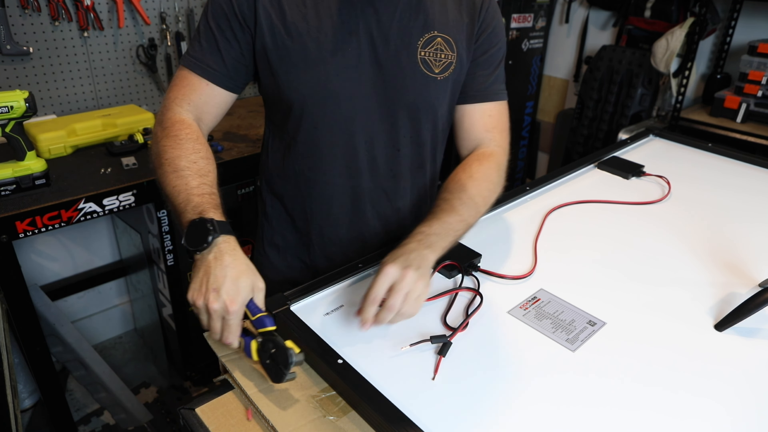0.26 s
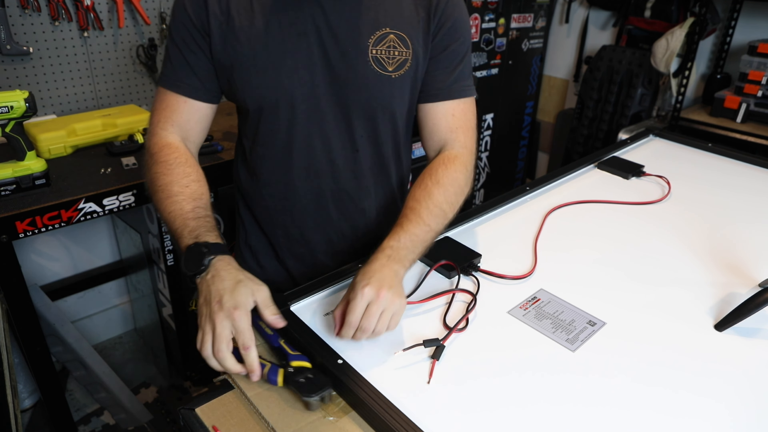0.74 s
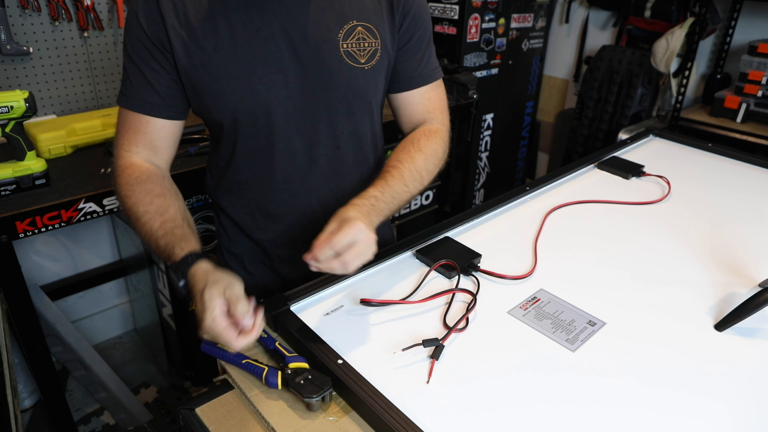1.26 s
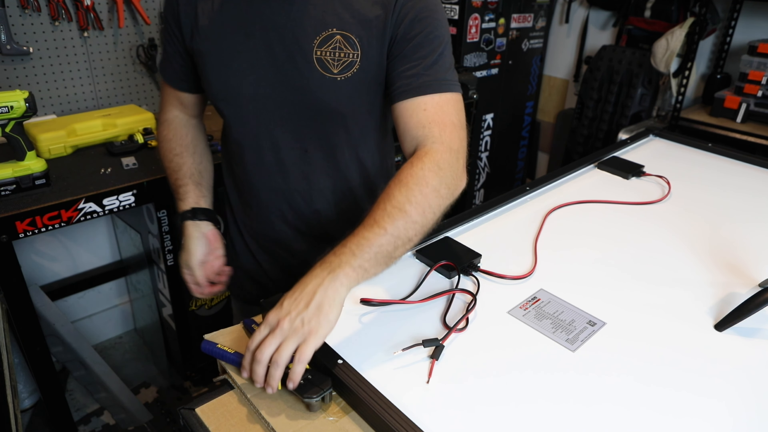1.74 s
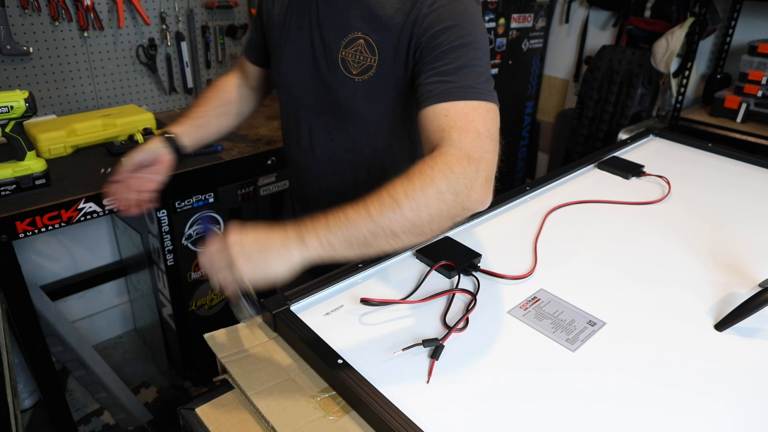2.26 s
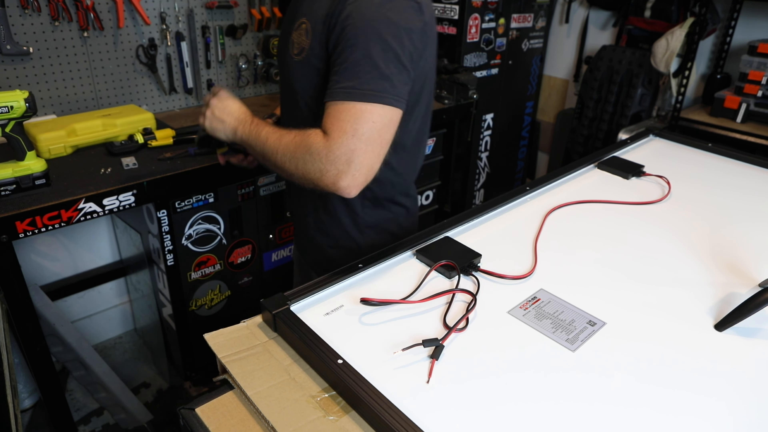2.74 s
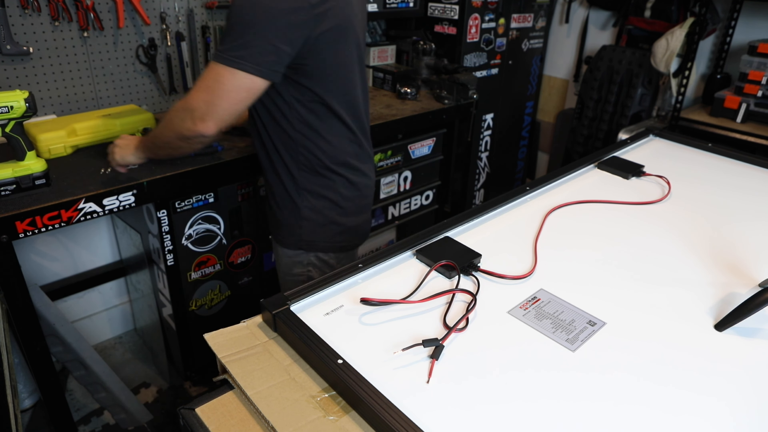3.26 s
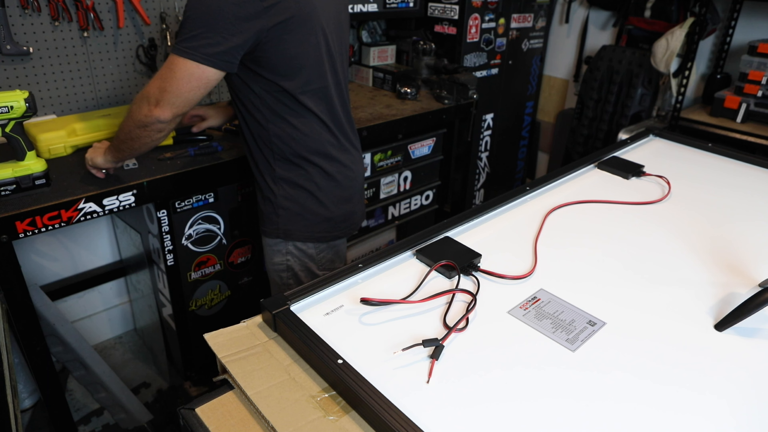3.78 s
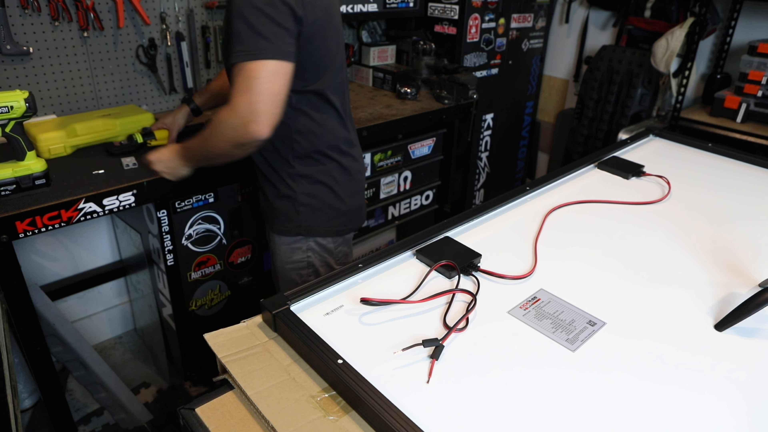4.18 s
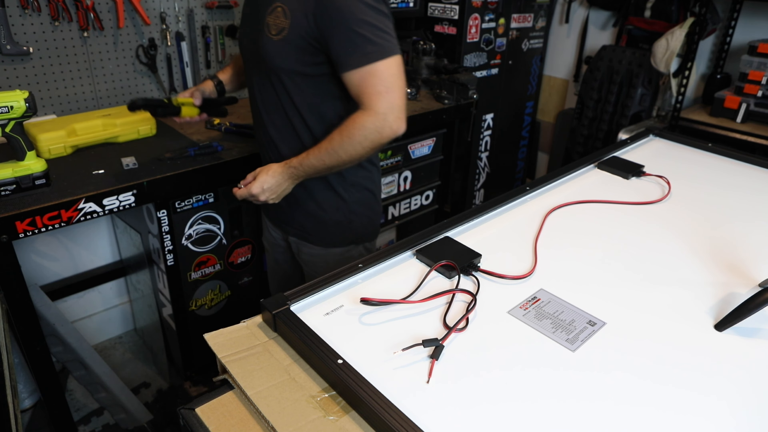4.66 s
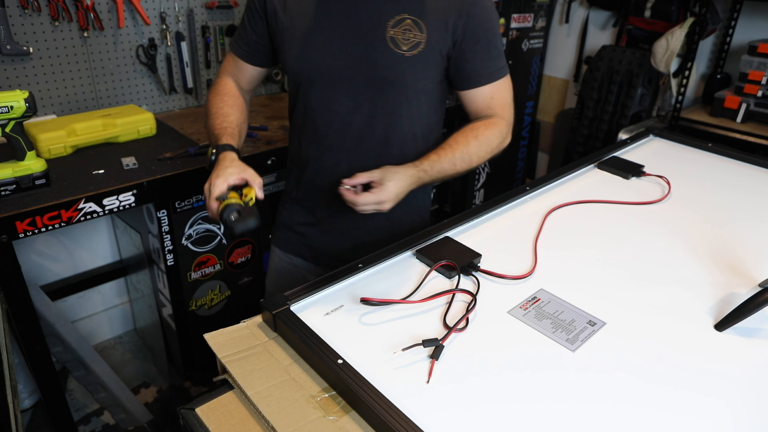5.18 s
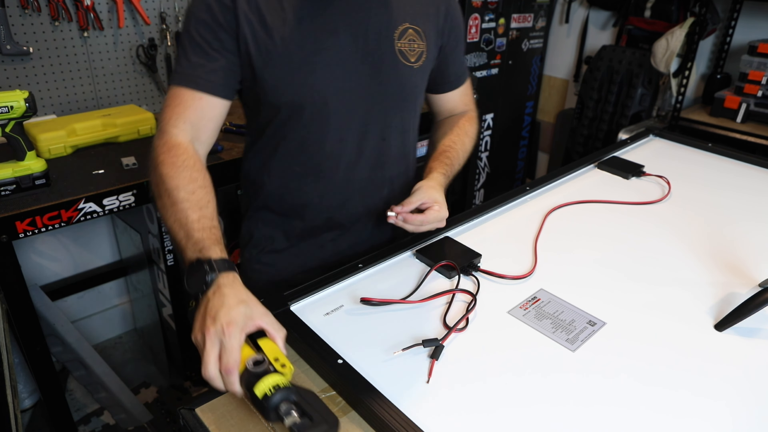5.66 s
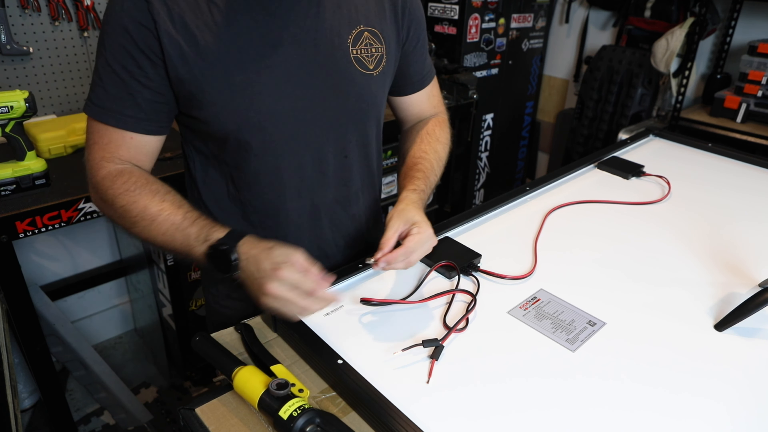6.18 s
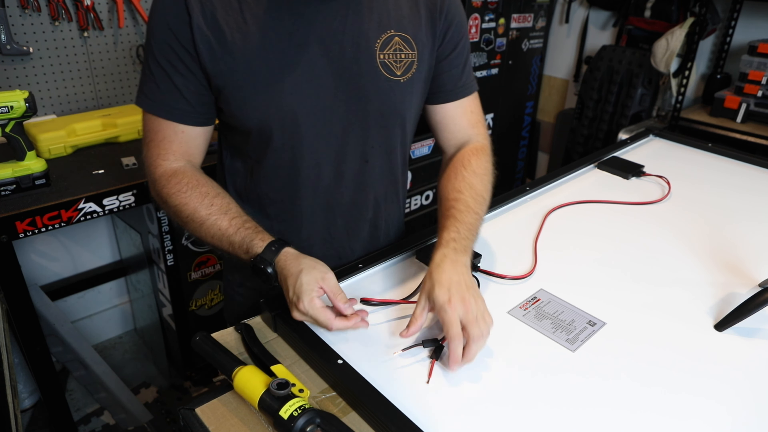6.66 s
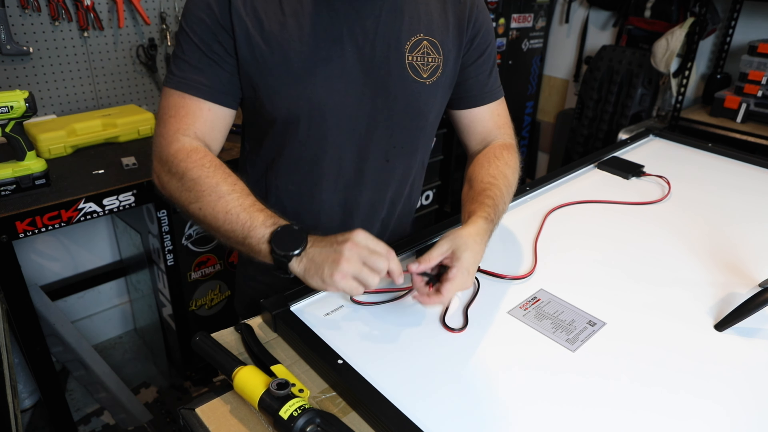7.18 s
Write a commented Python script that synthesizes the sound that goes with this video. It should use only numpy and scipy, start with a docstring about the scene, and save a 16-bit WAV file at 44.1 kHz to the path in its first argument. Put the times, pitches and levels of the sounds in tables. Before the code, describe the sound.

A small workshop with a short room echo, a faint fan rush slowly growing, low mains hum and hiss. From 0.1 to 0.35 seconds a wire stripper close by bites cable in several crisp clicks, then its spring snaps open at 0.36. Dull, bouncing thuds on a cardboard box come at 0.65 to 0.85, with lighter ones near 1.1. Cloth rustles softly; around 2.0 to 2.2 the tool is picked up with a table tap and small bumps. Loose steel clicks and rattles at 2.45 to 2.9. At 3.37 to 3.45 it lands on the farther bench in a tight, very loud wooden clatter, clipping the microphone, ringing briefly. Faint tool touches near 4.3, then grainy clothing and shoe scuffs, strongest around 5.05 and 5.57. A drill thumps onto the box at 5.9. Light taps on the table follow at 6.75 to 7.0, with very faint low drones drifting underneath.

```python
"""In a small workshop a wire stripper bites a cable, clicks, springs open and is laid on a cardboard box.
It is picked up, rattles, and lands on the far workbench with a loud knock that overloads the microphone.
Clothes and shoes scuff, a drill is set on the box and test leads tap the table, over a fan and mains hum.
Contacts are noise bursts filtered by the struck body, rings are dying sines, scuffs are grainy noise swells;
the fan is coloured noise, and the hum and drifting drones are sines."""
import sys
import numpy as np
from scipy import signal
from scipy.fft import rfft, irfft, next_fast_len
from scipy.io import wavfile
from scipy.ndimage import uniform_filter1d, map_coordinates

SR = 44100
rng = np.random.default_rng(int(sys.argv[2]) if len(sys.argv) > 2 else 0)


def unload_wav(signal):
    """Save mono or channel-first audio to the path in sys.argv[1] as 16-bit WAV at rate SR, clipped to [-1, 1]."""
    wavfile.write(
        sys.argv[1],
        SR,
        np.round(np.clip(np.atleast_2d(signal).T, -1, 1) * 32767).astype(np.int16),
    )


N = 327222
TIME = np.arange(N) / SR
HIT = np.arange(32768) / SR  # the time axis of one short sound, s
HIT_HZ = np.fft.rfftfreq(len(HIT), 1 / SR)

GRIP_OPENS_S, RATTLE_S = .6, 0.063  # the fist loosens; later contacts rattle with this 60 dB fade time
CARRY_S, CARRY_M_PER_S = 2.5, 1.15  # the stripper is carried off to the far bench
NEAR_M, FAR_M = .6, 1.9  # microphone to table, microphone to bench
ROOM_RADIUS_M = 1  # where the echo equals the direct sound
FLIGHT_SHRINK = 0.83  # each rebound's flight over the one before
FAN_DB, FAN_RISE_DB_PER_S = -65, 1.06  # shared gain of the fan's rush and whirr, and its slow growth
TOP_HZ = 15900  # band limit

# Blows, one table for each kind of contact. Each row: start in seconds, relative level in dB,
# bass shelf in dB, treble shelf in dB, frequency that the contact point favours in Hz.
# The jaws close on the cable.
JAW_BITES = [(.0984, 12, -3, 8, 1620), (.1627, -2, 18, -19, 813), (.2332, 11.5, -4.5, -13.5, 2230),
             (.3458, -4.5, -23, -13, 2600)]
# Loose steel levers click and rattle; same columns.
LEVER_CLICKS = [(0.178, -3.5, 3, -9.5, 9000), (0.1904, 0, 11, 2.5, 566), (0.2937, -12.5, 4, -1.5, 7400),
                (0.7688, -0.5, 3, -20.5, 4560), (2.09, -1.5, -7, -18, 4730), (2.449, 4.5, 6, -13, 9200),
                (2.6198, 7.5, -9, -23.5, 700), (2.815, -18.5, 13, -23, 1900), (2.936, -9, 1.5, -38, 948)]
# The spring throws the jaws open; same columns.
SPRING_SNAPS = [(.36, 0.77, 0, 8.5, 9000), (.3635, 8.6, 1.8, 8.5, 960), (.365, 5.2, 0, -5, 8900)]
# The stripper and the drill on the cardboard box; same columns.
BOX_THUDS = [(.663, 16.5, 1, 5.5, 1510), (.819, 20.5, 3.5, 9, 1180), (.8335, 25.5, -8, -30, 780),
             (1.0626, 7, -4.5, -1.5, 3170), (1.137, 3, -10.5, -7, 765), (1.9815, 0, 0, 10, 504),
             (2.018, 1.5, 4, 5, 350), (2.1925, 1, -29, 4, 890), (5.8735, 7.5, 4.5, 2, 90.5),
             (5.8946, 12, -3.5, 1, 1745), (5.937, -3, -8, 17, 5000), (5.9415, 13, -4.5, 1, 830)]
# Things knock against the table; same columns.
TABLE_TAPS = [(2.0535, 17.5, -1, 3, 1000), (6.7517, 3.5, 9.5, 3, 940), (6.8425, -10, 6.5, 4, 1505),
              (6.9956, 9.5, -8.5, -20, 513)]
# The stripper lands and rocks on the bench, the drill is lifted off it; same columns.
BENCH_KNOCKS = [(3.372, 29, 9.5, 12, 1650), (3.39, 36.5, -2, -4, 1080), (3.401, 35.5, -3.5, -7, 830),
                (3.42, 26.5, -3, -3, 1500), (3.433, 26.5, -2.5, -11.5, 900), (4.276, -13.5, -13, -3, 925),
                (4.378, -20, -24, 10, 2000)]

# Rubbing cloth and soles. Each row: peak time in seconds, level in dB, rise in seconds, centre of the rub in Hz.
RUBS = [(.02, -63.5, .02, 3600), (0.597, -57.5, 0.034, 2440), (1.53, -67.5, 0.03, 3300),
        (1.9, -71.5, 0.15, 2800), (2.278, -56.5, .08, 2780), (2.76, -56.5, 0.035, 4500),
        (3.03, -66, 0.057, 3700), (4.219, -64, .008, 1990), (4.291, -66.5, .014, 3400),
        (4.62, -61, .018, 3470), (5.033, -53.5, 0.015, 2970), (5.065, -47.5, 0.018, 2420),
        (5.081, -46.5, .015, 1120), (5.565, -47, .0035, 3640), (5.68, -62, 0.052, 3510),
        (6.23, -60, .0032, 2820)]

# Broad tone colour of each body. Each row: frequency in Hz, relative level in dB.
JAW_COLOUR = [(80, -44), (170, -17), (300, -9), (700, -6.5), (1500, -12.5), (3500, -15), (5800, -20),
              (7500, -26), (15000, -38)]
LEVER_COLOUR = [(60, -20.5), (130, -12), (250, -4.5), (650, -3.5), (1500, -1), (3500, -0.5), (8500, -2.5),
                (11000, -9.5), (15500, -18.5)]
SPRING_COLOUR = [(100, -32), (400, -17.5), (750, -9.5), (1000, -6.5), (1600, -12.5), (3200, -5.5),
                 (8500, -11.5), (11000, -13), (15500, -19)]
BOX_COLOUR = [(40, -27), (80, -10), (110, -6.5), (260, -3.5), (450, -10), (900, -13.5), (1500, -18),
              (3500, -27.5), (8000, -43.5), (15500, -54)]
TABLE_COLOUR = [(60, -18), (130, -21), (210, -7.5), (450, -14), (800, -6), (1300, -16), (3500, -22.5),
                (7000, -41.5), (15500, -54)]
BENCH_COLOUR = [(40, -38), (100, -14.5), (300, -13), (550, -9), (900, -3), (1600, -10), (2400, -16.5),
                (4000, -29.5), (8000, -38), (15500, -52)]
CLOTH_COLOUR = [(100, -20), (600, -10), (1000, -0.5), (2800, -5), (4000, -7), (5500, -10.5), (10000, -14),
                (15500, -24)]

# Broad resonances of each body. Each row: frequency in Hz, width in Hz, height above the colour in dB.
JAW_RESONANCES = [(930, 89, 12.5), (1360, 180, 12.5), (1860, 270, 16), (3750, 320, 20.5), (5370, 520, 15.5)]
LEVER_RESONANCES = [(940, 160, 6), (2537, 150, 7.4), (3620, 650, 8.8), (5760, 230, 9.3), (9080, 170, 9.9)]
SPRING_RESONANCES = [(886, 70, 22), (2330, 40, 3.1), (5470, 250, 5.1), (8200, 220, 1.5)]
BOX_RESONANCES = [(115, 33, 3), (247, 7.2, 4.6), (830, 190, 3.2), (1250, 230, 1.2)]
TABLE_RESONANCES = [(275, 55, 8.9), (470, 74, 6.5), (696, 135, 6), (940, 27, 1.7)]
BENCH_RESONANCES = [(150, 20, 5), (260, 45, 5), (457, 20, 6), (817, 38, 5), (923.5, 38, 3), (1590, 100, 3)]

# Bench top tones. Each row: frequency in Hz, relative level in dB, 60 dB decay in seconds before damping.
BENCH_TONES = [(150, -13, 0.38), (452, -6, 0.24), (494, -10.5, 0.6), (595.3, -15.5, 0.4), (807, -10, 0.39),
               (867, -4, 0.36), (954, 0, 0.23), (1001, -6.5, 0.36), (1120, -2.5, 0.66), (1180, -18.5, 0.69),
               (1297, -7.5, 0.25), (1640, -2.5, 0.13), (1900, -14.5, 0.32), (2024, -22.5, 0.53),
               (2132, -16.5, 0.32), (2417, -21, 0.23)]
# Stripper lever tones. Each row: frequency in Hz, relative level in dB, 60 dB decay in seconds.
STEEL_TONES = [(3520, 4, 0.27), (6020, -5, 0.39), (8840, -3, 0.42), (8750, -8, .2)]
# Tones of tools lying on the bench; same columns.
TOOL_TONES = [(880, -8.5, 2.2), (1168, 2, 1), (1822, -8, 1.1)]

# The room's echo. Each row: frequency in Hz, 60 dB decay in seconds.
ROOM_DECAY = [(60, 0.88), (200, 0.43), (500, 0.37), (1000, 0.45), (2000, 0.38), (4000, 0.31), (8000, 0.32),
              (15000, 0.13)]
# Colour of the fan's rush. Each row: frequency in Hz, relative level in dB.
FAN_COLOUR = [(20, -25), (50, -9), (80, -10.5), (200, -9), (440, -13.5), (700, -15), (900, -14),
              (1250, -21), (2500, -23), (4100, -27.5), (13600, -41), (16000, -39)]
# Drifting low tones. Each row: peak time in seconds, pitch in Hz, level in dB, half length in seconds.
DRONES = [(4.93, 199, -62.5, 0.19), (6.598, 200.3, -68, 0.64), (7.249, 146.2, -62, 0.42)]


def amp(db):
    """Decibels to gain."""
    return 10 ** (np.asarray(db) / 20)


def unit(x):
    """Scale to rms 1."""
    return x / np.sqrt(np.mean(x ** 2) + 1e-20)


def along(points, hz):
    """Read a curve of (Hz, value) points on a log frequency axis."""
    point_hz, values = np.transpose(points)
    return np.interp(np.log(hz + 1), np.log(point_hz), values)


def filtered(x, gain):
    """Apply a gain that depends on frequency."""
    size = next_fast_len(N + SR // 2)
    spectrum = rfft(x, size) * gain(np.fft.rfftfreq(size, 1 / SR))
    return irfft(spectrum, size)[:N]


def noise(gain):
    """Coloured noise of rms 1."""
    return unit(filtered(rng.standard_normal(N), gain))


def add(track, s, sound):
    """Mix a sound into the track at time s."""
    part = track[round(s * SR):][:len(sound)]
    part += sound[:len(part)]


def background(air_db, whirr_db, hum_db, hiss_db, whirr_hz=905, whirr_width=110, hum_hz=50.5):
    """A fan's rush with a narrow whirr, both slowly growing, over a low hum and an even hiss."""
    air = amp(air_db) * noise(lambda hz: amp(along(FAN_COLOUR, hz)) / np.sqrt(1 + (hz / 6000) ** 2))
    whirr = amp(whirr_db) * noise(lambda hz: 1 / (1 + (2 * (hz - whirr_hz) / whirr_width) ** 2))
    fan = amp(FAN_DB + FAN_RISE_DB_PER_S * TIME) * (air + whirr)
    hum = amp(hum_db) * np.sqrt(2) * np.sin(2 * np.pi * hum_hz * TIME)
    hiss = amp(hiss_db) * rng.standard_normal(N)
    return fan + hum + hiss


def drone(waver_hz=1):
    """Faint low sines of slowly wavering pitch drift in and out."""
    out = np.zeros(N)
    for s, hz, db, half_length in DRONES:
        pitch = hz + waver_hz * noise(lambda f: f < 10)
        swell = np.exp(-.5 * ((TIME - s) / half_length) ** 2)
        tone = np.sqrt(2) * np.sin(2 * np.pi * np.cumsum(pitch) / SR)
        out += amp(db) * swell * tone
    return out


def room_tail(build=0.0021):
    """A fresh diffuse echo of energy 1; each band of noise dies at its own rate."""
    hz, t, bands = signal.stft(rng.standard_normal(len(HIT)), SR, nperseg=256)
    decay = amp(-60 * t / along(ROOM_DECAY, hz)[:, None])
    tail = signal.istft(bands * decay, SR)[1][:len(HIT)]
    tail *= 1 - np.exp(-HIT / build)
    return tail / np.linalg.norm(tail)


def scuffs(grain_db, room_db, boost_db, fall, spread=0.49):
    """Short grainy rubs that swell and fade as the worker turns and steps."""
    out = np.zeros(N)
    for s, db, rise, centre_hz in RUBS:
        # Grip and slip: slower noise swings the loudness of the grains.
        grip = np.tanh(unit(uniform_filter1d(rng.standard_normal(len(HIT)), size=40)))
        grains = rng.standard_normal(len(HIT)) * amp(grain_db * grip)
        centre_boost_db = boost_db / (1 + ((HIT_HZ / centre_hz - 1) / spread) ** 2)
        colour_db = along(CLOTH_COLOUR, HIT_HZ) + centre_boost_db
        rub = unit(irfft(rfft(grains) * amp(colour_db)))
        lead = min(s, .25)  # seconds of room for the rise
        offset = np.maximum((lead - HIT) / rise, (HIT - lead) / fall)
        rub *= amp(db) * np.exp(1 - np.hypot(1, offset))  # a swell with a rounded top
        add(out, s - lead, rub)
        add(out, s - lead, amp(room_db) * signal.fftconvolve(rub, room_tail()))
    return out


def causal(db):
    """Minimum-phase response with these levels: it rings only after the blow."""
    cepstrum = irfft(np.log(amp(db)))
    cepstrum[1:len(HIT) // 2] *= 2
    cepstrum[len(HIT) // 2 + 1:] = 0
    return np.exp(rfft(cepstrum))


def shelves(hz, bass_db, treble_db, bass_hz=400, treble_hz=2800):
    """A heavy contact has more bass, a hard one more treble."""
    bass = bass_db / (1 + (hz / bass_hz) ** 2)
    treble = treble_db * hz ** 2 / (hz ** 2 + treble_hz ** 2)
    return bass + treble


def chatter(length):
    """Force of one contact: a dying burst of micro-impacts with a nearly even spectrum and energy 1."""
    fade = np.exp(-np.log(1000) * HIT / max(length, .002))
    spectrum = rfft(rng.standard_normal(len(HIT)) * fade)
    even_burst = irfft(spectrum / (np.abs(spectrum) + 1e-9))
    force = even_burst * fade ** .25
    return force / np.linalg.norm(force)


def contacts(rows, colour, modes, boost_db, echo_share, ripple_db=4.0, spread=.17):
    """Each contact sounds through the struck body; the room hears all its sides, so its peaks blur there."""
    colour_db = along(colour, HIT_HZ)
    modes_db = sum(db / (1 + (2 * (HIT_HZ - hz) / width) ** 2) for hz, width, db in modes)
    ripple_place = [24 * np.log1p(HIT_HZ / 500)]
    out = np.zeros(N)
    for s, db, bass_db, treble_db, favoured_hz, length, room_db in rows:
        # The point of contact favours one region and weights the many fine modes anew.
        point_db = boost_db / (1 + ((HIT_HZ / favoured_hz - 1) / spread) ** 2)
        ripple = map_coordinates(rng.standard_normal(128), ripple_place)
        peaks_db = modes_db + ripple_db * ripple
        blow_db = db + colour_db + point_db + shelves(HIT_HZ, bass_db, treble_db)
        direct = rfft(chatter(length)) * causal(blow_db + peaks_db)
        echo = rfft(room_tail()) * causal(blow_db + room_db + echo_share * peaks_db)
        add(out, s, irfft(direct + echo))
    return out


def settling(rows, length, room_db, flight_s, loss_db, lighter_db, count):
    """A landing rebounds: each contact follows sooner, weaker and with less weight than the last."""
    out = []
    for s, db, bass_db, treble_db, favoured_hz in rows:
        for k in range(count):
            level_db = db - k * loss_db
            weight_db = bass_db - k * lighter_db
            out.append((s, level_db, weight_db, treble_db, favoured_hz, length, room_db))
            s += flight_s * FLIGHT_SHRINK ** k
    return out


def ring(hz, t60, attack):
    """Dying sines with a soft start and a chance phase."""
    decay = np.exp(-np.log(1000) * HIT / t60) * (1 - np.exp(-HIT / attack))
    return decay * np.sin(2 * np.pi * (hz * HIT + rng.random(np.shape(hz))))


def bench_ring(ring_db):
    """The hardest knock sets the damped wooden bench top ringing."""
    out = np.zeros(N)
    hz, level_db, t60 = np.transpose(BENCH_TONES)[:, :, None]
    t60 = np.minimum(t60, .32)  # damping caps the decay, s
    knock_at = max(BENCH_KNOCKS, key=lambda row: row[1])[0]
    tones = amp(ring_db + level_db) * ring(hz, t60, attack=.004)
    add(out, knock_at, np.sum(tones, axis=0))
    return out


def pings(steel_db, tools_db):
    """The sharpest loose click rings the stripper's steel; the hardest knock shakes tools on the bench."""
    out = np.zeros(N)
    _, click_at = max((db + treble_db, s) for s, db, _, treble_db, _ in LEVER_CLICKS if s > GRIP_OPENS_S)
    _, knock_at = max((db, s) for s, db, *_ in BENCH_KNOCKS)
    for s, blow_db, tones in ((click_at, steel_db, STEEL_TONES), (knock_at, tools_db, TOOL_TONES)):
        for hz, db, t60 in tones:
            add(out, s, amp(blow_db + db) * ring(hz, t60, attack=.003))
    return out


def in_hand(rows, click_s):
    """A squeezed stripper clicks, a loose one rattles; the room answers more as it is carried away."""
    out = []
    for s, *blow in rows:
        distance = np.clip(NEAR_M + CARRY_M_PER_S * (s - CARRY_S), NEAR_M, FAR_M)
        room_db = 20 * np.log10(distance / ROOM_RADIUS_M)
        length = RATTLE_S if s > GRIP_OPENS_S else click_s
        out.append((s, *blow, length, room_db))
    return out


def scene():
    """The stripper, the surfaces it meets, the worker and the room."""
    bites = in_hand(JAW_BITES, click_s=.011)
    clicks = in_hand(LEVER_CLICKS, click_s=0.0072)
    snaps = in_hand(SPRING_SNAPS, click_s=0.011)
    jaws = contacts(bites, JAW_COLOUR, JAW_RESONANCES, boost_db=6.0, echo_share=0.61)
    levers = contacts(clicks, LEVER_COLOUR, LEVER_RESONANCES, boost_db=6, echo_share=.7)
    spring = contacts(snaps, SPRING_COLOUR, SPRING_RESONANCES, boost_db=8.0, echo_share=0.25)

    on_box = settling(BOX_THUDS, length=0.029, room_db=-4.5, flight_s=.016, loss_db=4.5, lighter_db=4, count=3)
    on_table = settling(TABLE_TAPS, length=0.057, room_db=-2.5, flight_s=0.0083,
                        loss_db=3.5, lighter_db=0.5, count=2)
    on_bench = settling(BENCH_KNOCKS, length=0.058, room_db=-7.0, flight_s=0.0064,
                        loss_db=6, lighter_db=2.5, count=2)
    box = contacts(on_box, BOX_COLOUR, BOX_RESONANCES, boost_db=6.0, echo_share=0.67)
    table = contacts(on_table, TABLE_COLOUR, TABLE_RESONANCES, boost_db=2.5, echo_share=0.66)
    bench = contacts(on_bench, BENCH_COLOUR, BENCH_RESONANCES, boost_db=5.5, echo_share=.9)
    bench += bench_ring(ring_db=-13)

    steel_and_tools = pings(steel_db=-45.5, tools_db=-40.0)
    worker = scuffs(grain_db=8.5, room_db=-5, boost_db=13.0, fall=0.018)
    room = background(air_db=-2.0, whirr_db=-12.0, hum_db=-66, hiss_db=-68) + drone()
    return (jaws + levers + spring + steel_and_tools + box + table + bench + worker + room)[None]


def record(dry):
    """The input clips at full scale, then a steep low-pass cuts what lies above the band limit."""
    low_pass = signal.ellip(10, .1, 70, TOP_HZ, fs=SR, output="sos")
    return signal.sosfilt(low_pass, np.clip(dry, -1, 1))


dry = scene()
out = record(dry)
unload_wav(out)
```